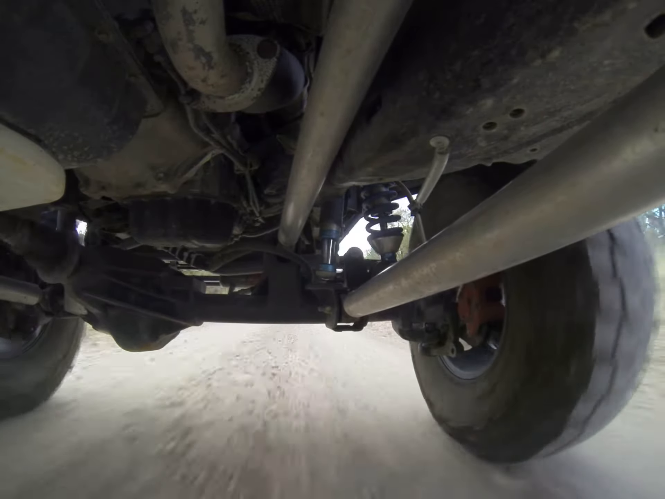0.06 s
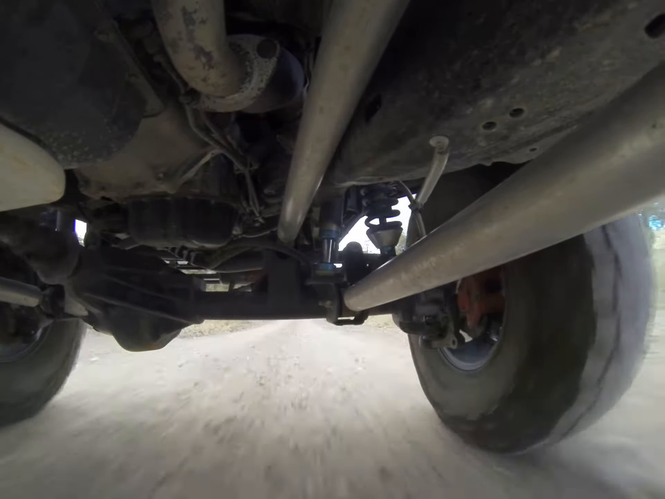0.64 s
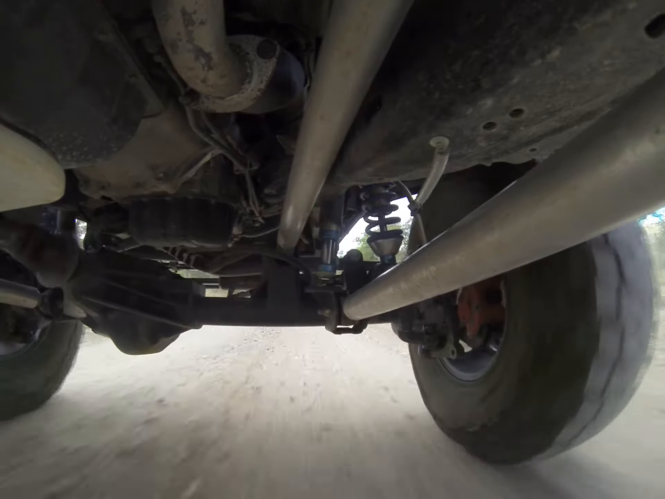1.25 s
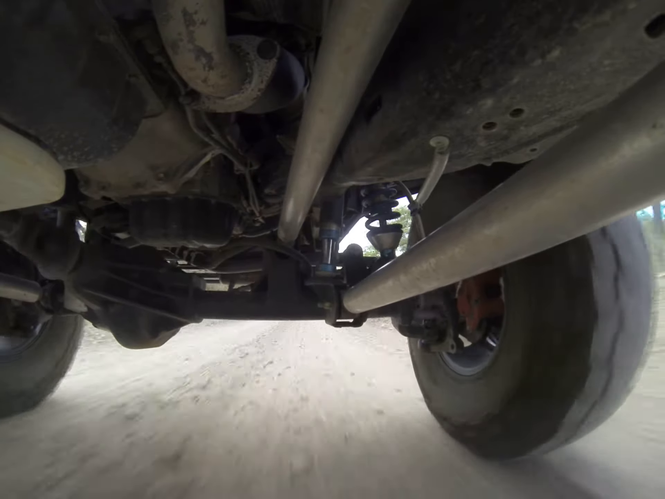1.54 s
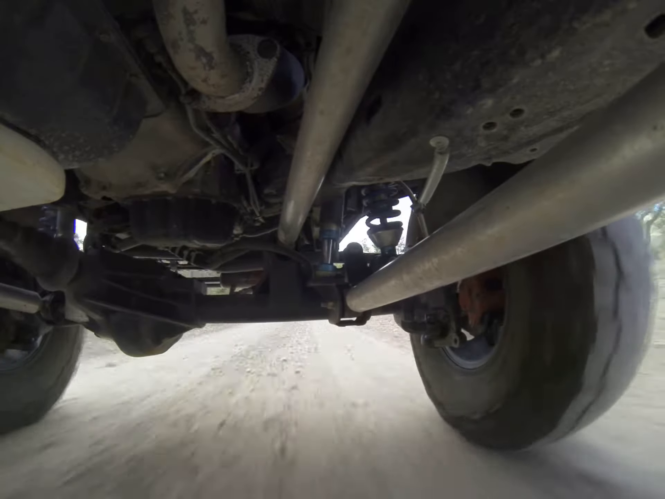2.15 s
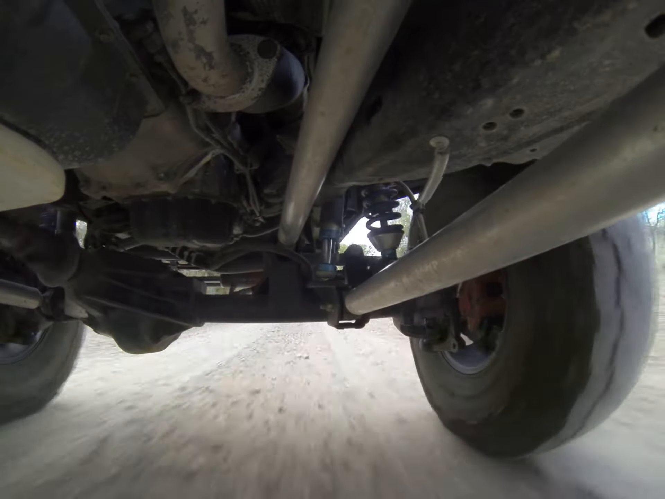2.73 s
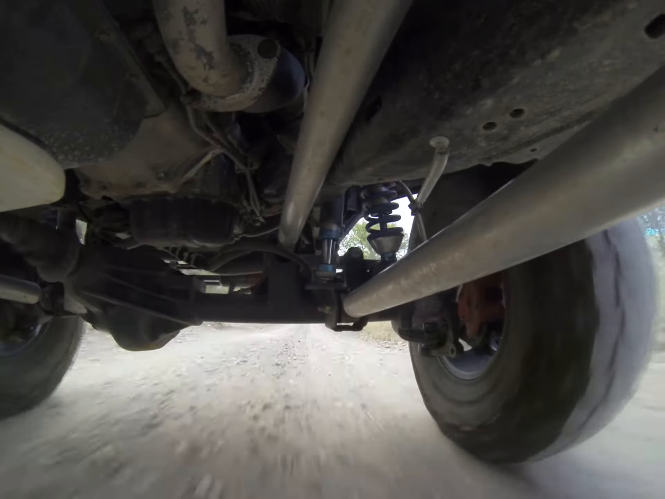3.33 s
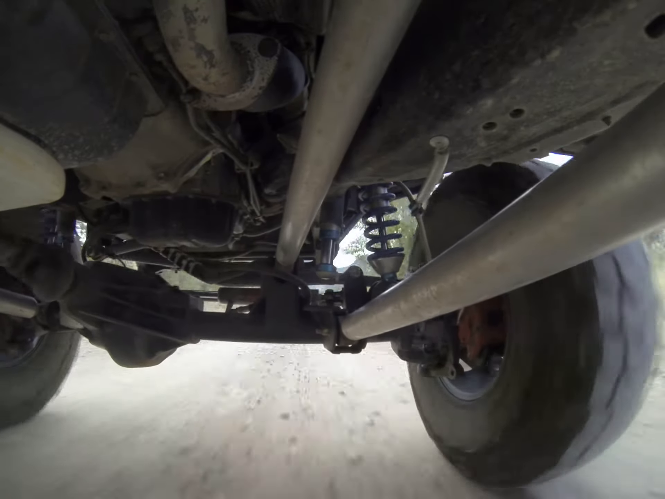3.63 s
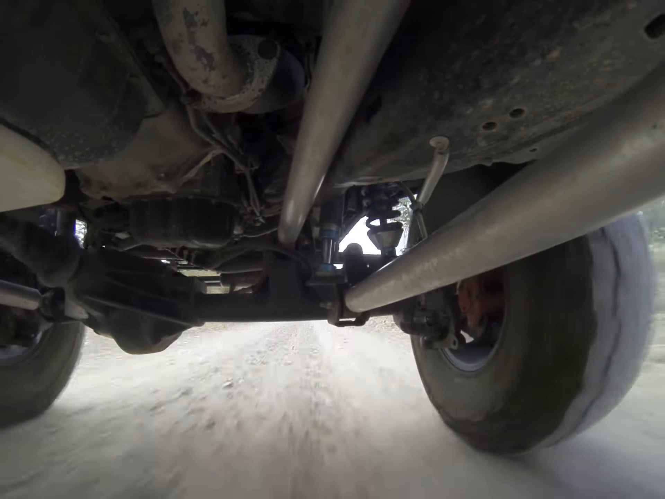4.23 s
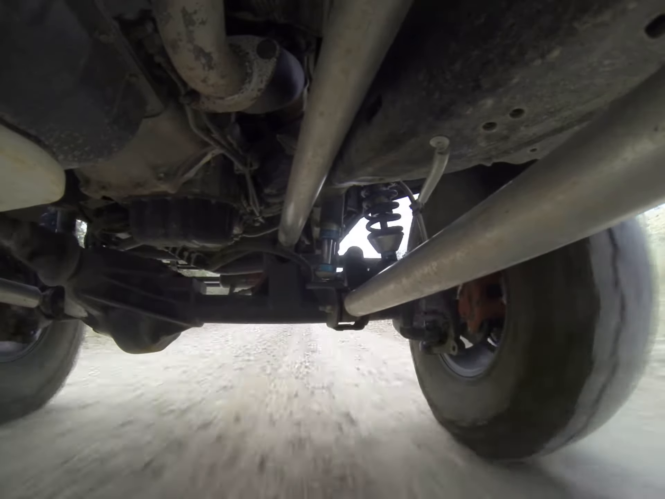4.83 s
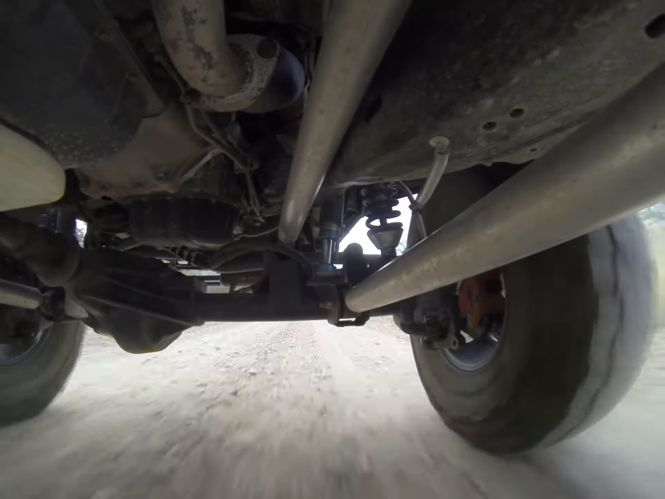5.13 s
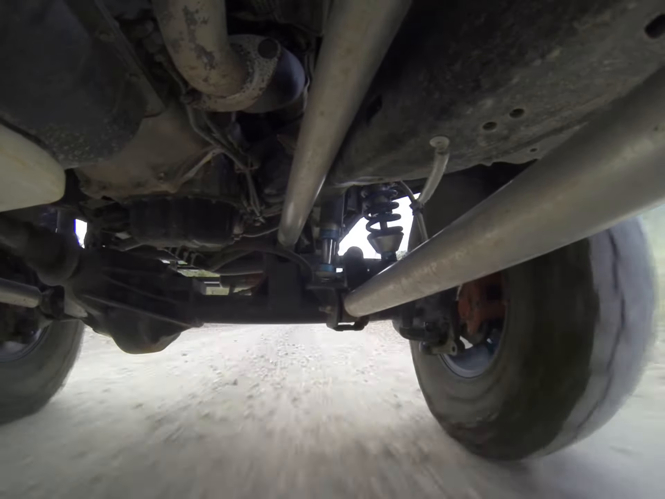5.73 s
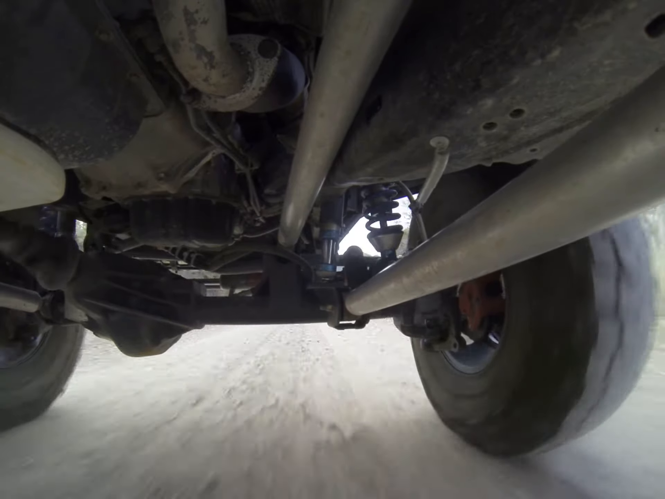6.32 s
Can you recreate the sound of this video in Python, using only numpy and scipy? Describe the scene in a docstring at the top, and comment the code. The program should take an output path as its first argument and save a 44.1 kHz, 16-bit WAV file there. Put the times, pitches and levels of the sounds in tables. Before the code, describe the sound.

Gravel crunches and tyres thump continuously, heard from right under a truck slowly gathering speed on a dirt road. The rolling noise swells on loose stones and eases on packed dirt, over a wavering low hum, bassy wind flutter and a faint whine from the gears. Small stones click against the metal now and then. Around the middle a larger one knocks sharply on the frame and the suspension gives short squeaks.

```python
"""Under a truck on a dirt road

Close up, from a microphone fixed beneath a lifted truck that slowly gathers speed. The tyres thump the
axle and frame and crush gravel that rings the underbody panels. Air flutters in the deep bass, with faint
engine noise above it. One low resonance drones on, swelling and faltering, and the drive gears whine
with the road speed. Thrown stones tick and knock on the metal, and the suspension squeaks briefly."""
import sys
import numpy as np
from scipy import signal
from scipy.fft import rfft, irfft, next_fast_len
from scipy.io import wavfile
from scipy.ndimage import uniform_filter1d, minimum_filter1d

SR = 44100
rng = np.random.default_rng(int(sys.argv[2]) if len(sys.argv) > 2 else 0)


def wrap_up_sound(samples):
    """Save the sound to the file named by the first command line argument, as 16-bit audio."""
    columns = np.atleast_2d(samples).T
    # keep every value between -1 and 1, then stretch to whole-number steps
    tamed = np.clip(columns, -1, 1)
    steps = np.round(tamed * 32767).astype(np.int16)
    wavfile.write(sys.argv[1], SR, steps)


N = 289737
TIME = np.arange(N) / SR

# loose gravel that heaps under the tread until thrown clear; levels are those on leaving the patch:
# enter_s, leave_s, crunch_db, rumble_db, growth_db
GRAVEL_PATCHES = [(-0.102, 0.08, -22, -16.0, 2), (0.079, 0.648, -24, -17, 2), (0.676, 0.965, -28, -19.5, 5),
                  (0.978, 1.417, -20.5, -12, 7.5), (1.444, 1.804, -23.5, -14.5, 9.5),
                  (1.81, 2.314, -23.5, -16.5, 10), (2.298, 2.61, -24.5, -17.5, 6.5),
                  (2.599, 2.869, -28, -20.5, -2), (2.856, 3.091, -32, -22.0, 1),
                  (3.299, 3.544, -26.5, -20, 2.0), (3.581, 3.936, -24.5, -16.5, 6.5),
                  (4.05, 4.287, -25.0, -18.5, 5), (4.283, 4.695, -25.5, -16, 4),
                  (4.698, 4.841, -24, -14, 7), (4.846, 5.207, -27.5, -18.5, 1.0),
                  (5.227, 5.5, -28.5, -21.0, 2.5), (5.499, 5.688, -21.5, -12.5, 5.5),
                  (5.685, 6.116, -26.5, -19.5, 3), (6.411, 6.605, -29, -28.5, 1.5)]
# single bumps that jolt the axle and crush the gravel harder: centre_s, crunch_db, rumble_db
ROAD_BUMPS = [(0.38, -31.5, -17), (0.962, -28.5, -17), (1.211, -30, -16), (1.94, -28.5, -23),
              (2.29, -25, -18), (2.56, -26, -13), (3.43, -32, -20), (3.79, -27, -21), (5.02, -27, -16.5),
              (5.921, -28, -20.5)]
# resonances of axle, tyres and frame: pitch_hz, half_width_hz, relative_db
AXLE_MODES = [(52, 16, -14.5), (93.8, 4.6, 1), (135, 20, -12), (147.3, 32, -1.5), (197, 33, -10.5),
              (285.3, 18.8, 0), (329.4, 12, -10.5), (370, 14, -17.5), (440, 26, -26.5)]
# broad resonances of underbody panels and microphone housing: pitch_hz, half_width_hz, relative_db
PANEL_MODES = [(701, 51, -3.5), (746.4, 15, -1), (930, 224, -11.5), (880.5, 36, -2), (1168, 55, -5.5),
               (1207, 90, -9.5), (1345, 23, -4), (1461, 26, -2), (1609, 99, -1.5), (1930, 34, -16.5),
               (2057, 82, -14), (2244, 86, -16.5), (2510, 92, -14), (2800, 130, -17), (3130, 91, -31),
               (3370, 160, -26), (3760, 46, -27), (3893, 132, -29), (4220, 160, -32.5), (4730, 108, -33.5),
               (5060, 160, -37.5), (5300, 274, -43.5), (5970, 220, -47), (6600, 480, -52.5),
               (7424, 1400, -57), (9179, 5900, -59)]
# narrow rings of steel arms and tubes: pitch_hz, half_width_hz, relative_db
STEEL_MODES = [(690, 9, -6), (770, 9, -4), (1111, 10, -5), (1304, 12, -3), (1412, 14, -7), (1661, 12, -2),
               (2076, 15, -14), (2293, 12, -17), (2561, 9, -19), (2585, 11, -13), (2948, 20, -17),
               (2980, 12, -18), (3382, 16, -26), (3431, 16, -23), (3903, 11, -28), (3975, 10, -34),
               (4211, 12, -29), (4738, 7, -35), (4862, 20, -33), (5050, 7, -36), (6367, 14, -42),
               (6480, 60, -45)]
# bright bands of spraying grit: pitch_hz, half_width_hz, relative_db
GRIT_MODES = [(3850, 150, 2.5), (5170, 320, 2), (6400, 710, -9.5), (9600, 2200, -14.5)]
# two deep bands of fluttering air, then one of faint engine noise: pitch_hz, half_width_hz, relative_db
AIR_ENGINE_BANDS = [(39, 9.1, 0.5), (58.5, 17, 0.5), (450, 370, -28)]
# strength of air and engine noise together: time_s, level_db
AIR_ENGINE_LEVEL = [(0, -30), (1.3, -31.5), (1.8, -37.5), (2.4, -31.5), (3.2, -31), (4.6, -31.5),
                    (5.8, -29.5), (6.57, -30.5)]
# wandering pitch of the low drone: time_s, pitch_hz
DRONE_TRACK = [(0.12, 114.8), (1.32, 116.1), (1.38, 112.8), (2.08, 115.5), (3.1, 113.7), (3.42, 116.6),
               (3.82, 111.6), (4.47, 114.2), (4.79, 112.0), (4.9, 116.6), (6.28, 113.5), (6.57, 118.2)]
# brief dips in the drone's swing: centre_s, lost_fraction, half_length_s
DRONE_FALTERS = [(0.032, 1, 0.026), (0.367, .65, 0.048), (.51, 0.97, 0.037), (0.715, 0.79, 0.017),
                 (1.212, 0.64, 0.019), (1.355, 0.64, 0.039), (1.585, 0.98, 0.026), (2.544, 0.76, 0.028),
                 (3.328, 0.62, .03), (3.773, 0.94, .018), (4.105, .75, 0.075), (4.766, .85, 0.032),
                 (4.978, 0.74, 0.05), (5.606, 0.8, .035), (5.902, 0.64, 0.031)]
# speed of the drive shaft: time_s, turns_hz
SHAFT_SPEED = [(0, 26.4), (0.3, 26.52), (0.65, 26.75), (1, 26.73), (1.4, 27.38), (1.8, 27.4), (2.2, 27.62),
               (2.6, 27.8), (3.1, 28.05), (3.5, 27.95), (3.8, 27.95), (4.1, 28.68), (4.5, 28.57),
               (4.9, 28.7), (5.2, 28.82), (5.6, 28.8), (6, 28.55), (6.57, 28.3)]
# gears, each singing out at the shaft speed where it meets a ring of the steel:
# meshes_per_turn, steady_relative_db, ring_shaft_hz, ring_relative_db
GEAR_MESHES = [(24, -45, 28.7, -41), (29, -42.5, 26.5, -32), (40, -42, 27.7, -44), (48, -47, 27.6, -44),
               (56, -47, 26.5, -36.5), (58, -37, 28.68, -35.5)]
# small stones on bare metal: start_s, peak_db
STONE_TICKS = [(0.9188, -43), (1.2365, -48), (1.2522, -35), (1.285, -40), (1.72, -46), (1.936, -40),
               (3.1757, -56), (3.7326, -42.5), (3.9005, -45), (3.991, -50), (3.999, -48), (4.2113, -47),
               (4.4602, -42), (5.0655, -44), (5.6795, -52), (5.8975, -41), (6.2801, -52)]
# what a tick rings: pitch_hz, half_width_hz, relative_db
TICK_MODES = [(4480, 1600, 7.5), (6500, 900, -10.0), (10500, 2300, -9)]
# heavy stones against the frame: start_s, peak_db, decay_s
STONE_KNOCKS = [(2.596, -20, .003), (3.9845, -6, .004), (3.991, -16, .004), (4.212, -18, .003),
                (5.682, -18, .005), (5.977, -21, .004), (6.492, -20, .005)]
# what a knock rings: pitch_hz, half_width_hz, relative_db
FRAME_MODES = [(850, 150, -4), (1350, 210, -1), (1840, 210, -1.5), (2920, 404, -23.5), (6000, 1400, -42)]
# squeaks of the suspension: start_s, level_db, pitch_hz, length_s
JOINT_SQUEAKS = [(3.74, -24, 1305, .045), (4.273, -18, 1660, .014), (4.28, -24, 1660, .06)]

PACKED_CRUNCH_DB, PACKED_RUMBLE_DB = -35, -24.5  # on the packed dirt between patches


def undb(db):
    """Decibels to gain."""
    return 10 ** (np.asarray(db) / 20)


def unit(x):
    """Scale to an rms of 1."""
    return x / np.sqrt(np.mean(x ** 2))


def curve(table):
    """Join (time_s, value) rows with straight lines."""
    return np.interp(TIME, *np.transpose(table))


def walk(rate_hz):
    """Random levels, each held for 1 / rate_hz seconds and smoothed twice; spread near 1."""
    hold = max(int(SR / rate_hz), 2)
    held = rng.standard_normal(N)[np.arange(N) // hold]
    return 1.103 * uniform_filter1d(uniform_filter1d(held, hold), hold)


def mode_power(modes, size):
    """Power spectrum of steep-sided resonances, for an FFT of this size."""
    f = np.arange(size // 2 + 1) * SR / size
    return sum(undb(db) ** 2 / (1 + ((f - hz) / width) ** 2) ** 2 for hz, width, db in modes)


def ring(force, modes):
    """Pass a force through a resonant body; the result has an rms of 1."""
    size = next_fast_len(N + SR // 2, real=True) // 2 * 2
    cepstrum = irfft(np.log(mode_power(modes, size)) / 2, size)
    # minimum phase: the body rings only after each push
    cepstrum[1:size // 2] *= 2
    cepstrum[size // 2 + 1:] = 0
    response = np.exp(rfft(cepstrum))
    return unit(irfft(rfft(force, size) * response, size)[:N])


def grains(per_s, spread_db):
    """Tiny impacts at random moments, many weak and a few strong."""
    hit = rng.random(N) < per_s / SR
    size = undb(spread_db * np.minimum(rng.exponential(size=N), 5))
    return unit(hit * size * rng.choice([-1, 1], N))


def road(bump_half_s=0.026, bite_s=0.06, clear_s=0.036):
    """Crunch and rumble in dB: tyres bite into each patch, heap its stones and shed them; bumps surge."""
    surges = [(np.exp(-((TIME - centre_s) / bump_half_s) ** 2), crunch_db, rumble_db)
              for centre_s, crunch_db, rumble_db in ROAD_BUMPS]
    for enter_s, leave_s, crunch_db, rumble_db, growth_db in GRAVEL_PATCHES:
        bite = np.clip((TIME - enter_s) / bite_s, 0, 1)
        heap = undb(np.interp(TIME, [enter_s, leave_s], [-growth_db, 0]))
        clear = np.exp(-np.maximum(TIME - leave_s, 0) / clear_s)
        surges.append((bite * heap * clear, crunch_db, rumble_db))
    crunch_power = undb(PACKED_CRUNCH_DB) ** 2 + sum((shape * undb(db)) ** 2 for shape, db, _ in surges)
    rumble_power = undb(PACKED_RUMBLE_DB) ** 2 + sum((shape * undb(db)) ** 2 for shape, _, db in surges)
    return 10 * np.log10(crunch_power), 10 * np.log10(rumble_power)


def tyres(crunch_db, rumble_db):
    """The tyres shake the axle and crush gravel that rings panels and steel; the same jolts drive both."""
    jolt_db = walk(30)
    rumble = ring(rng.standard_normal(N), AXLE_MODES) * undb(rumble_db + jolt_db)
    crush = undb(crunch_db + jolt_db + 1.1 * walk(140))
    panels = ring(grains(per_s=3200, spread_db=2.5), PANEL_MODES) * undb(-1.5)
    steel = ring(grains(per_s=3000, spread_db=2.5), STEEL_MODES) * undb(-7)
    return rumble + (panels + steel) * crush


def grit(rough_db, packed_db=-69.5):
    """The tread flings fine grit even on smooth ground, so the spray swells less than the crunch."""
    spray = grains(per_s=800, spread_db=4.4) * undb(3.6 * walk(24))
    return ring(spray, GRIT_MODES) * undb(packed_db + 0.55 * rough_db)


def air_and_engine():
    """Air under the truck flutters in the deep bass; the engine adds a faint noise around 450 Hz."""
    return ring(rng.standard_normal(N), AIR_ENGINE_BANDS) * undb(curve(AIR_ENGINE_LEVEL))


def drone(rough_db, packed_db=-11, slip_hz=8.95):
    """One low resonance of the truck, nearly a sine: full on packed dirt, weaker and shaky on gravel."""
    swing = 1
    for centre_s, lost, half_length_s in DRONE_FALTERS:
        swing = swing * (1 - lost * np.exp(-((TIME - centre_s) / half_length_s) ** 2))
    pitch_hz = curve(DRONE_TRACK) + slip_hz * (1 - swing) * walk(30)  # strays as the swing dies down
    shake, sag = 0.23, 0.34  # dB per dB of roughness
    level_db = packed_db + rough_db * (shake * walk(22) - sag)
    return np.sqrt(2) * np.sin(2 * np.pi * np.cumsum(pitch_hz) / SR) * swing * undb(level_db)


def gears(crunch_db, ring_half_width_hz=0.11):
    """Meshing teeth whine in step with the shaft, louder across a ring and when rough ground loads them."""
    shaft_hz = curve(SHAFT_SPEED)
    flutter = 1 + 0.0012 * walk(25)
    shaft_angle = 2 * np.pi * np.cumsum(shaft_hz * flutter) / SR
    whine = 0
    for meshes, steady_db, ring_shaft_hz, ring_db in GEAR_MESHES:
        detuning = (shaft_hz - ring_shaft_hz) / ring_half_width_hz
        level = np.hypot(undb(steady_db), undb(ring_db) / np.hypot(1, detuning))
        load_flutter = undb(2.4 * walk(28))
        phase = meshes * shaft_angle + 0.43 * walk(45)
        whine = whine + np.sqrt(2) * np.sin(phase) * level * load_flutter
    load_db = 0.9 * (crunch_db - np.mean(crunch_db))
    return whine * undb(load_db - 0.5)


def strikes(rows, modes, attack_s=0.00044):
    """Each stone chatters against a ringing part: a burst of noise coloured by its resonances."""
    out, count = np.zeros(N), 4096
    colour = np.sqrt(mode_power(modes, count))
    age = np.arange(count) / SR
    for start_s, peak_db, decay_s in rows:
        chatter = irfft(rfft(rng.standard_normal(count)) * colour)
        blow = chatter * np.exp(-age / decay_s) * (1 - np.exp(-age / attack_s))
        blow *= undb(peak_db) / np.abs(blow).max()
        start = int(start_s * SR)
        out[start:start + count] += blow[:N - start]
    return out


def stones(tick_decay_s=0.0025):
    """Thrown stones hit the metal: bright ticks from small ones, dull knocks from large ones."""
    ticks = [(start_s, peak_db, tick_decay_s) for start_s, peak_db in STONE_TICKS]
    return strikes(ticks, TICK_MODES) + strikes(STONE_KNOCKS, FRAME_MODES)


def squeaks():
    """A suspension joint sticks and slips for a moment, so that one ring of the steel sings out."""
    out = np.zeros(N)
    wobble_rad = 0.44 * walk(320)
    for start_s, level_db, pitch_hz, length_s in JOINT_SQUEAKS:
        swell = np.sin(np.pi * np.clip((TIME - start_s) / length_s, 0, 1))
        out += np.sqrt(2) * undb(level_db) * swell * np.sin(2 * np.pi * pitch_hz * TIME + wobble_rad)
    return out


def scene():
    """Everything under the truck, close to one microphone that rides with it."""
    crunch_db, rumble_db = road()
    rough_db = crunch_db - PACKED_CRUNCH_DB  # extra crunch over packed dirt
    whine = gears(crunch_db)
    rolling = tyres(crunch_db, rumble_db) + grit(rough_db)
    return (rolling + air_and_engine() + drone(rough_db) + whine + stones() + squeaks())[None]


def record(dry):
    """The microphone rig drops the deepest bass, limits the highest peaks and cuts the top."""
    low_cut_hz, top_hz, ceiling = 22, 15000, 0.8
    low_cut = signal.butter(2, low_cut_hz, "high", fs=SR, output="sos")
    top_cut = signal.ellip(8, 0.2, 70, top_hz, fs=SR, output="sos")
    x = signal.sosfilt(low_cut, dry)
    gain = np.minimum(1, ceiling / (np.abs(x) + 1e-9))
    held = minimum_filter1d(gain, size=400)
    smoothed = uniform_filter1d(uniform_filter1d(held, size=200), size=200)
    return signal.sosfilt(top_cut, x * smoothed)


dry = scene()
out = record(dry)
wrap_up_sound(out)
```